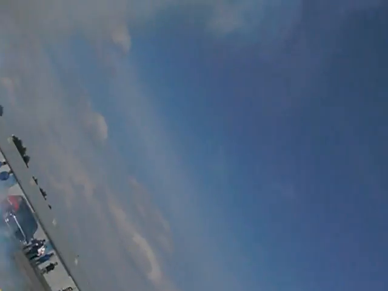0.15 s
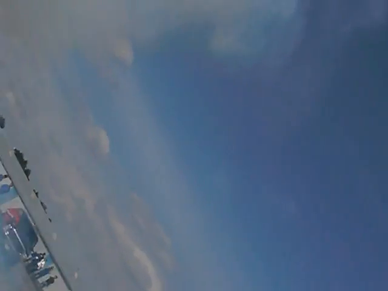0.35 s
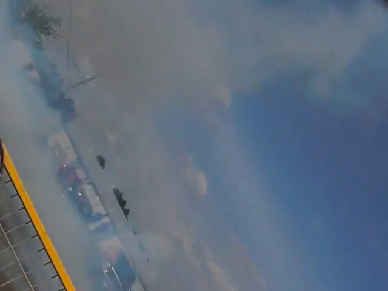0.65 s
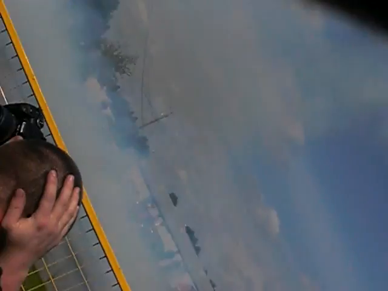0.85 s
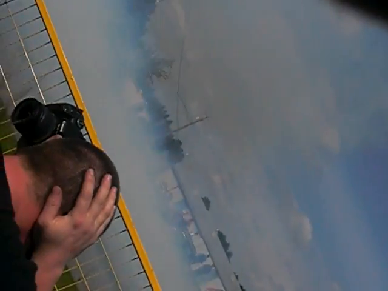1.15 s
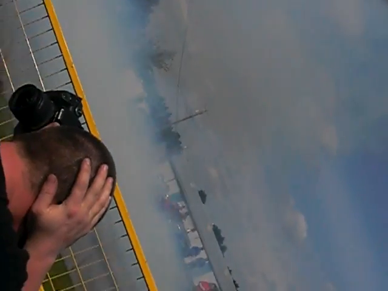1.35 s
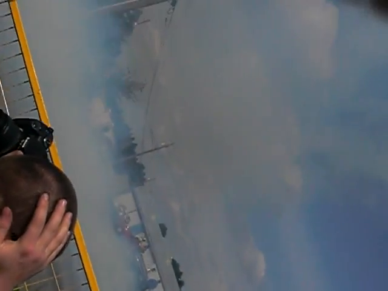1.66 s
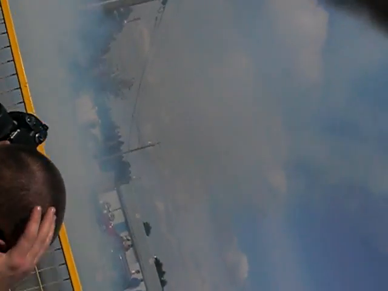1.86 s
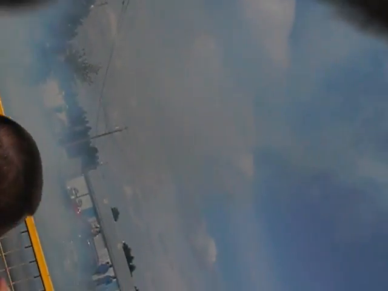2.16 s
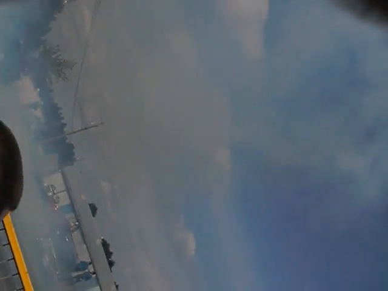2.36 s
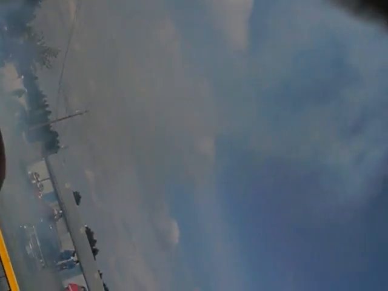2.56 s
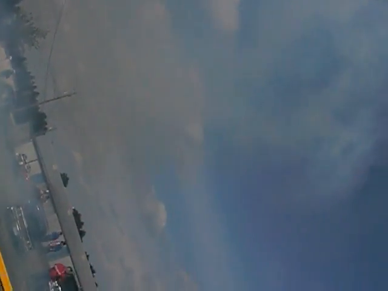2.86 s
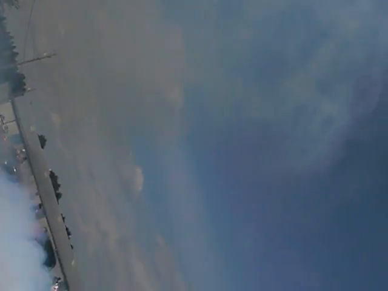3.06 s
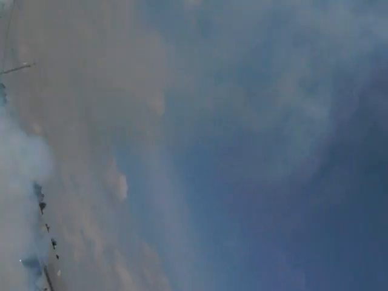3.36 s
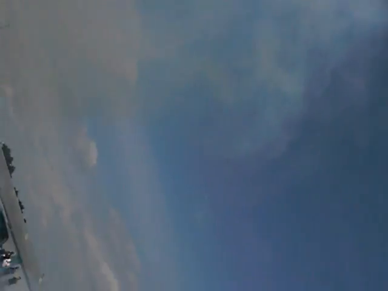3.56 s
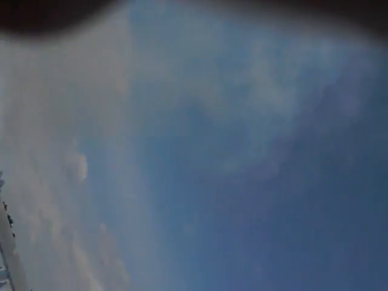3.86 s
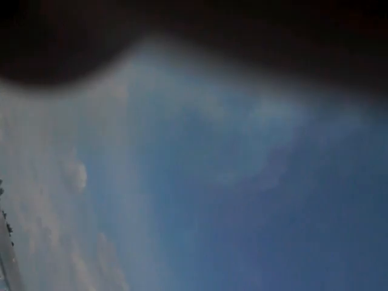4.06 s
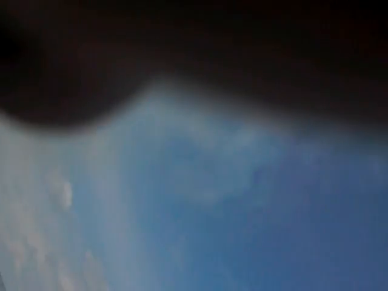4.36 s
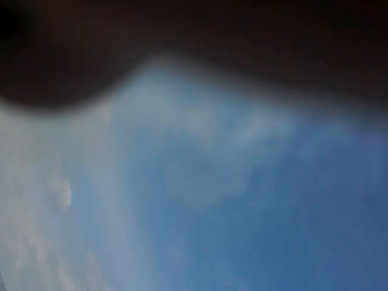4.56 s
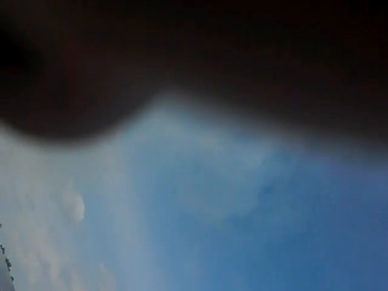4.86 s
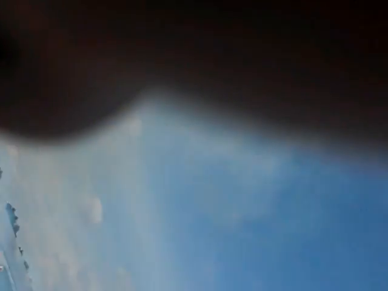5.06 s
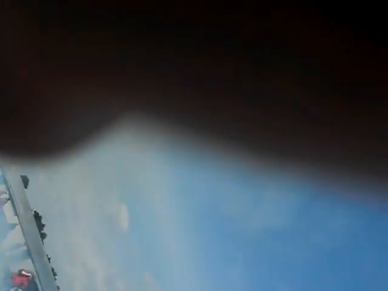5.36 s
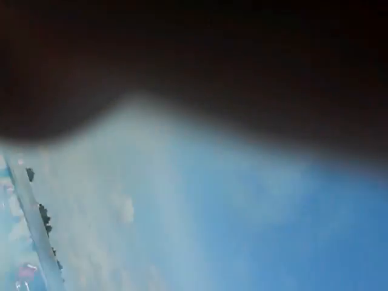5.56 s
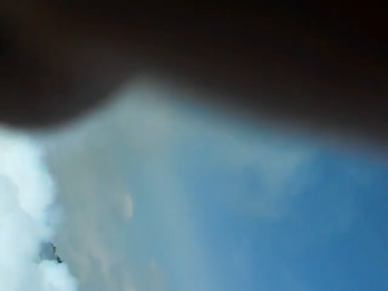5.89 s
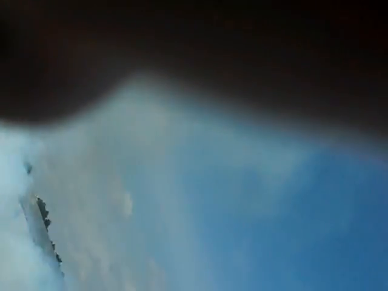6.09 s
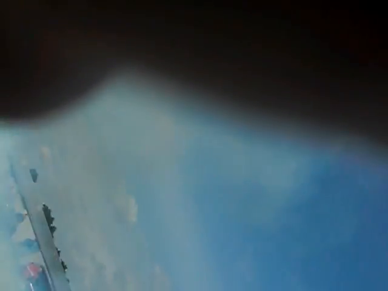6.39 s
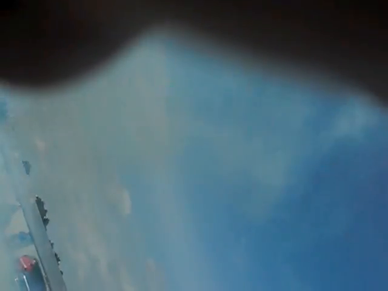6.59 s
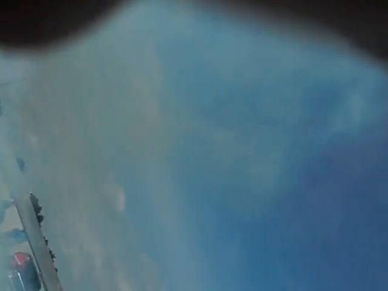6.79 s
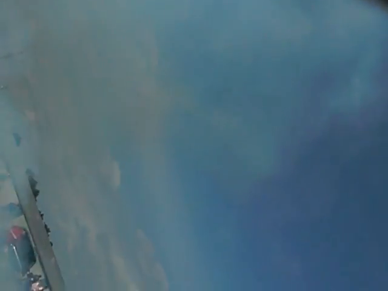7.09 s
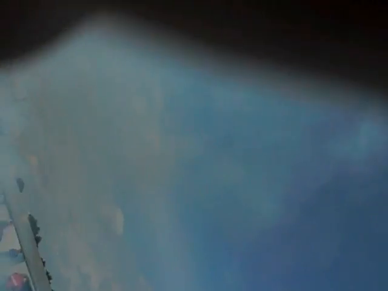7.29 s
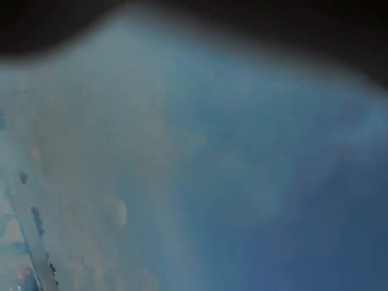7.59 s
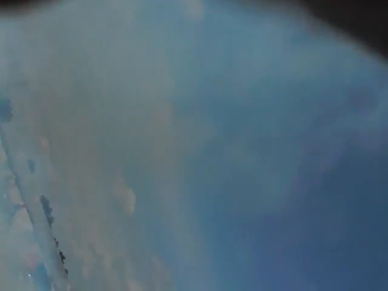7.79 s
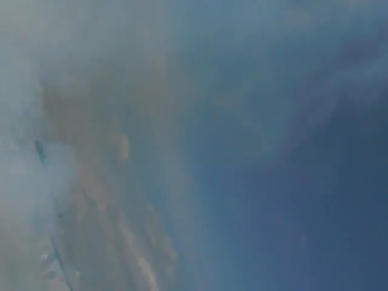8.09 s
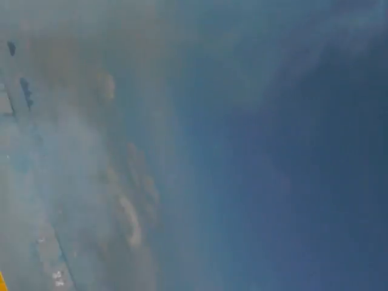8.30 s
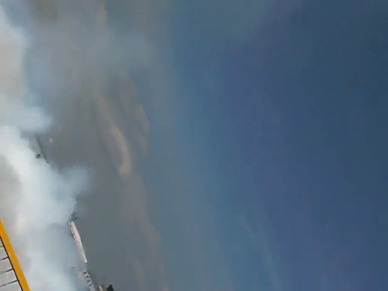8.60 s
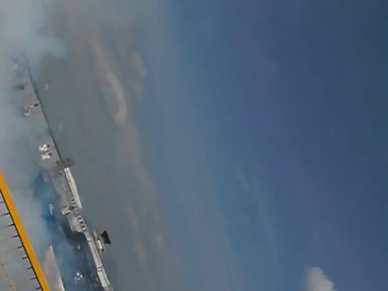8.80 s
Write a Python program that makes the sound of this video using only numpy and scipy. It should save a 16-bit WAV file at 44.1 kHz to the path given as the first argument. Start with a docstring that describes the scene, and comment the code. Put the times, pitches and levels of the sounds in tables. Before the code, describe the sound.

Sharp afterburner bangs come in quick clusters over the steady roar and high whine of a jet engine outdoors.

```python
"""A jet car's turbine runs on a drag strip: turbulent mixing makes a low roar and hiss, the compressor
blades a thin whine. Short afterburner pops overload the microphone with crackling bangs and drag the
shaft speed down; the governor adds fuel and the whine swings back with a small overshoot.
Every bang pushes the camera's gain down, and the roar creeps up again in the pauses."""
import sys
import numpy as np
from scipy import signal
from scipy.fft import rfft, irfft, next_fast_len
from scipy.io import wavfile
from scipy.ndimage import uniform_filter1d, minimum_filter1d, map_coordinates

SR = 44100
rng = np.random.default_rng(int(sys.argv[2]) if len(sys.argv) > 2 else 0)


def persist_wave(psi):
    """Save psi, clipped to +-1, as 16-bit WAV."""
    counts = np.round(np.clip(psi, -1, 1) * 32767).astype(np.int16)
    wavfile.write(sys.argv[1], SR, np.atleast_2d(counts).T)


N = 394254
TIME = np.arange(N) / SR


def amp(db):
    """Amplitude ratio of a level in decibels."""
    return 10 ** (np.asarray(db) / 20)


def curves(rows, times=TIME):
    """Linear interpolation of each column after the time."""
    t, *columns = np.transpose(rows)
    return [np.interp(times, t, column) for column in columns]


def wobble(rate):
    """Smooth random fluctuation: a spline through rate Gaussian knots a second."""
    knots = rng.standard_normal(int(N * rate / SR) + 4)
    return map_coordinates(knots, [TIME * rate])


def filtered(x, response):
    """Convolution theorem: the spectrum of x is multiplied by a frequency response."""
    size = next_fast_len(N + 8192)
    hz = np.fft.rfftfreq(size, 1 / SR)
    return irfft(rfft(x, size) * response(hz), size)[:N]


def coloured(x, points):
    """Minimum-phase filtering through (f/Hz, level/dB) points: folding the cepstrum makes it causal."""
    f, db = np.transpose(points)

    def response(hz):
        magnitude = amp(np.interp(np.log(hz + 1), np.log(f), db))
        cepstrum = irfft(np.log(magnitude))
        half = len(cepstrum) // 2
        cepstrum[1:half] *= 2
        cepstrum[half + 1:] = 0
        return np.exp(rfft(cepstrum))
    return filtered(x, response)


def noise(spectrum):
    """Spectral shaping of white noise, normalised to rms 1."""
    x = coloured(rng.standard_normal(N), spectrum)
    return x / np.std(x)


def gate(age, hold, rise, fall):
    """Exponential onset, then exponential decay once hold has passed; all times in seconds."""
    return (1 - np.exp(-age / rise)) * np.exp(-np.maximum(age - hold, 0) / fall)


# Relative spectra of the exhaust bands, large eddies to small: f/Hz, level/dB
RUMBLE_SPECTRUM = [(20, -2), (40, 0.5), (52, -17), (80, -8), (125, -6.5), (170, -1), (205, -3), (245, 1),
                   (310, -0.5), (365, -5), (430, -5), (490, -12.5), (560, -28.5), (1200, -100)]
ROAR_SPECTRUM = [(300, -47.5), (570, -6), (660, -3.5), (900, 0.5), (1100, -2), (1400, -9), (2000, -24.5),
                 (4000, -95)]
RUSH_SPECTRUM = [(700, -47.5), (1300, -1.5), (1600, 0.5), (2000, 1), (2450, 2), (2900, -4.5), (3400, -10),
                 (4300, -52), (8000, -110)]
HISS_SPECTRUM = [(2200, -24), (3500, 2), (4400, 2), (5200, 2.5), (6000, 3.5), (6600, -1), (7300, -2.5),
                 (8200, 0), (9300, -2.5), (10500, -5.5), (11500, -4), (12300, -17)]
# Base level of the rumble: t/s, level/dB
RUMBLE_LEVEL = [(0, -26.5), (0.5, -25), (1.2, -25.5), (1.7, -25), (1.98, -28), (2.28, -24), (2.7, -23.5),
                (3.15, -18), (3.4, -26.5), (4.8, -27.5), (5.8, -28), (7.0, -27), (7.35, -27.5), (8.94, -28)]
# Upper bands re the rumble, as the camera is turned and covered: t/s, rush level/dB, hiss level/dB
UPPER_LEVELS = [(0, -7, -7.5), (0.8, -7.5, -13.5), (2.3, -8, -12), (3.2, -9.5, -14), (4.6, -6.5, -13),
                (5.5, -8.5, -14.5), (6.3, -9.5, -15), (7.3, -11, -13), (8.05, -11.5, -14), (8.3, -14, -9),
                (8.94, -13.5, -11)]


def exhaust(sag_hz, fuel_db_per_hz=0.0271, fuel_lag_s=0.073, roar_db=-8, gust_db=0.5, eddy_db=0.3):
    """Turbulent jet mixing: big eddies rumble, small ones hiss; fuel and gusts move them together."""
    level, = curves(RUMBLE_LEVEL)
    rush_db, hiss_db = curves(UPPER_LEVELS)
    # the governor adds fuel shortly after each sag in shaft speed
    fuel_db = fuel_db_per_hz * np.interp(TIME - fuel_lag_s, TIME, sag_hz)
    level = level + fuel_db + gust_db * wobble(9)
    bands = [(0, RUMBLE_SPECTRUM), (roar_db, ROAR_SPECTRUM),
             (rush_db, RUSH_SPECTRUM), (hiss_db, HISS_SPECTRUM)]
    return sum(amp(level + db + eddy_db * wobble(22)) * noise(spectrum) for db, spectrum in bands)


# Colour of the hiss as the camera is moved and covered: t/s, dip f/Hz, peak f/Hz, peak level/dB
HISS_COLOUR = [(0, 2800, 8600, 8), (0.4, 2850, 8500, 8), (0.7, 4390, 8700, 13), (1.25, 4450, 8700, 13),
               (1.701, 3530, 8150, 7), (2.7, 3450, 8100, 2), (3.1, 3480, 9100, 7), (3.7, 3940, 8200, 1),
               (6.4, 4080, 8200, 1), (7.6, 3900, 7900, -1), (8.94, 3120, 7200, -2)]


def shaded(x, shelf_hz=7430, shelf_db=-9, dip_db=-4):
    """Time-varying filtering: a fixed shelf dulls the treble while a dip and a peak drift in the hiss."""
    hz, t, spectra = signal.stft(x, SR, nperseg=512)
    hz = hz[:, None]
    dip_hz, peak_hz, peak_db = curves(HISS_COLOUR, t)
    shelf = shelf_db * (0.5 + 0.5 * np.tanh((hz - shelf_hz) / 500))
    dip = dip_db * np.exp(-((hz - dip_hz) / 300) ** 2)
    peak = peak_db * np.exp(-((hz - peak_hz) / 650) ** 2)
    return signal.istft(spectra * amp(shelf + dip + peak), SR, nperseg=512)[1][:N]


# Blade-passing frequency that the governor aims for: t/s, f/Hz
BLADE_SETPOINT = [(0, 5830), (.35, 5943), (1.3, 5938), (1.8, 5985), (2.15, 5937), (2.45, 5973), (3.2, 5957),
                  (4.4, 5959), (6.45, 6002), (6.85, 5974), (7.1, 5987), (8.94, 6004)]


def governor(brake_hz_per_burn_s=4000, settle_s=0.237, swing_hz=2.17):
    """Damped oscillation of the shaft speed as each pop brakes it; gives blade tone and sag in Hz."""
    setpoint_hz, = curves(BLADE_SETPOINT)
    sag_hz = np.zeros(N)
    for start, burn, _, _ in AFTERBURNER_POPS:
        age = np.maximum(TIME - start, 0)
        swing = np.exp(-age / settle_s) * np.sin(2 * np.pi * swing_hz * age)
        sag_hz += brake_hz_per_burn_s * burn * swing
    return setpoint_hz - sag_hz, sag_hz


def narrowband(phase, rate):
    """Random quadrature modulation spreads a tone into a band that widens with rate."""
    return wobble(rate) * np.sin(phase) + wobble(rate) * np.cos(phase)


# Base level of the direct blade tone: t/s, level/dB
WHINE_LEVEL = [(0, -37), (0.3, -44), (0.8, -40), (1.15, -53), (1.42, -57), (1.58, -39.5), (2.0, -49.5),
               (2.6, -45), (3.05, -34.5), (3.7, -48), (4.05, -39), (4.3, -46.5), (5.0, -44.5), (5.6, -46),
               (6.32, -50), (6.5, -38), (6.66, -39), (6.87, -55), (7.1, -46), (8.1, -43), (8.94, -49)]


def compressor_whine(blade_hz, jitter_hz=7, fade_db=1.4, flutter_db=3.5,
                     skirt_db=-10, overtone_db=-29, scatter_db=-49, octave_db=-59):
    """Blade-passing tone with two weak higher shaft orders; hot turbulent air scatters part of it."""
    phase = 2 * np.pi * np.cumsum(blade_hz + jitter_hz * wobble(70)) / SR
    level = curves(WHINE_LEVEL)[0] + fade_db * wobble(9)  # swells and fades in the moving air
    tone = amp(flutter_db * wobble(25)) * np.sin(phase)
    skirt = amp(skirt_db) * narrowband(phase, 160)
    overtone = amp(overtone_db) * np.sin(phase * 4 / 3)
    scattered = amp(scatter_db) * narrowband(phase, 90)
    octave = amp(octave_db) * narrowband(2 * phase, 220)
    return np.sqrt(2) * amp(level) * (tone + skirt + overtone) + scattered + octave


# Afterburner pops: start t/s, burn t/s, blow-out t/s, relative crackle level/dB
AFTERBURNER_POPS = [(-.025, .051, 0.01, -2), (0.04, 0.0064, 0.0018, -11), (0.1335, 0.05, 0.004, -3),
                    (.202, 0.01, 0.0061, -9), (0.4665, 0.044, 0.026, 0), (0.6462, .047, 0.029, -4),
                    (3.2207, 0.016, 0.027, -5), (3.36, 0.042, 0.02, 0.5), (3.514, 0.048, 0.015, 0),
                    (3.8089, 0.051, 0.0052, -1), (3.9557, 0.052, 0.015, 0), (4.1048, 0.052, 0.0067, -2),
                    (4.519, 0.048, 0.0082, -4.5), (4.674, 0.049, 0.016, -3), (5.06, 0.048, 0.0069, -6.5),
                    (5.2245, 0.043, 0.0064, -4), (5.3912, .044, 0.0051, -7.5), (7.081, 0.034, 0.0079, -3.5),
                    (7.22, 0.044, 0.019, -3), (7.686, 0.024, 0.021, -4.5), (8.119, 0.029, 0.013, -5),
                    (8.7398, 0.032, 0.014, -4), (8.924, 0.033, 0.014, -3)]
# Relative spectra of a pop's flame, its thump and its echo around the grounds: f/Hz, level/dB
CRACKLE_SPECTRUM = [(60, -33.5), (300, 9), (560, -3.5), (820, 5.5), (1400, 1.5), (2600, 3.5), (3200, -5),
                    (5000, -5.5), (6100, -6.5), (8000, -13), (12000, -18.5)]
THUMP_SPECTRUM = [(20, -19), (60, -8.5), (130, -7.5), (240, -1.5), (350, -2), (550, -13.5), (900, -21),
                  (2000, -37), (6000, -62), (13000, -79)]
ECHO_SPECTRUM = [(20, -10), (45, -3.5), (70, -7), (110, -0.5), (200, -11), (350, -16.5), (550, -25),
                 (1000, -24), (3000, -44), (8000, -81)]


def afterburner(shock_s=0.0011, snap_db=-12, crackle_db=-6.5, sputter_db=-20, rough_db=3,
                thump_db=-14, whump_db=-14.5, echo_db=-32, full_echo_burn_s=0.046):
    """Unsteady combustion: an ignition shock, crackle as the fuel burns, a low whump at blow-out."""
    shock, crackle, thump, echo = np.zeros((4, N))
    for start, burn, blow_out, db in AFTERBURNER_POPS:
        age = np.maximum(TIME - start, 0)
        shock_age = age / shock_s
        shock += (age > 0) * (1 - shock_age) * np.exp(-shock_age / 2)  # steep front, then suction
        crackle += amp(snap_db) * gate(age, 0.0017, rise=0.0021, fall=0.0041)
        crackle += amp(crackle_db + db) * gate(age, burn - 0.003, rise=0.0029, fall=0.0044)
        crackle += amp(sputter_db) * gate(age, burn + blow_out, rise=0.0012, fall=0.0016)
        thump += amp(thump_db) * gate(age, burn + blow_out, rise=0.00055, fall=0.0033)
        whump_age = np.maximum(age - burn + 0.0023, 0)
        thump += amp(whump_db) * gate(whump_age, 0.0039, rise=0.0031, fall=0.011)
        echo += burn / full_echo_burn_s * gate(age, burn, rise=0.028, fall=0.22)
    spurts = amp(rough_db * wobble(300))  # the flame burns unevenly
    flame = spurts * crackle * noise(CRACKLE_SPECTRUM)
    return shock + flame + thump * noise(THUMP_SPECTRUM) + amp(echo_db) * echo * noise(ECHO_SPECTRUM)


def gain_control(x, limit_db=-8, recover_db_per_s=4, look_ahead_s=0.0022):
    """Automatic gain control: the gain drops to hold a peak at the limit, then climbs steadily."""
    span = int(look_ahead_s * SR)
    headroom_db = limit_db - 20 * np.log10(np.abs(x) + 1e-6)
    allowed_db = minimum_filter1d(headroom_db, 2 * span + 1)
    climb_db = recover_db_per_s * TIME
    gain_db = np.minimum.accumulate(allowed_db - climb_db) + climb_db
    return x * amp(uniform_filter1d(gain_db, span))


def scene():
    """Superposition of exhaust, whine and pops at the microphone."""
    blade_hz, sag_hz = governor()
    return (shaded(exhaust(sag_hz)) + compressor_whine(blade_hz) + afterburner())[None]


# Frequency response of the microphone: f/Hz, level/dB
MICROPHONE_RESPONSE = [(20, -27), (70, 2), (300, 0.5), (560, 0), (900, -0.5), (2600, -2), (3500, 0),
                       (6000, -1), (7200, -3.5), (9500, -8.5), (12000, -6)]


def record(dry, ceiling_db=-8, knee=6, low_cut_hz=85, top_hz=12150):
    """Saturation rounds off the pops; gain control, bass cut, colouring and a band limit follow."""
    clipped = dry[0] / (1 + np.abs(dry[0] / amp(ceiling_db)) ** knee) ** (1 / knee)
    low_cut = signal.butter(2, low_cut_hz, "highpass", fs=SR, output="sos")
    thinned = signal.sosfilt(low_cut, gain_control(clipped))
    return filtered(coloured(thinned, MICROPHONE_RESPONSE), lambda hz: hz < top_hz)[None]


dry = scene()
out = record(dry)
persist_wave(out)
```